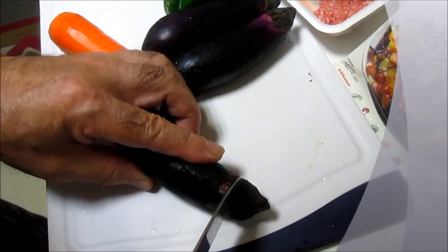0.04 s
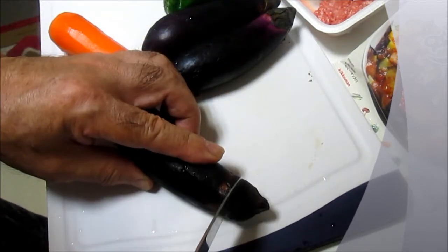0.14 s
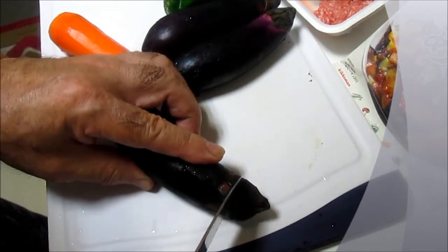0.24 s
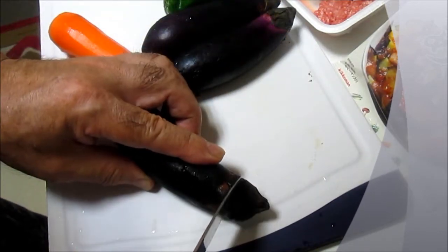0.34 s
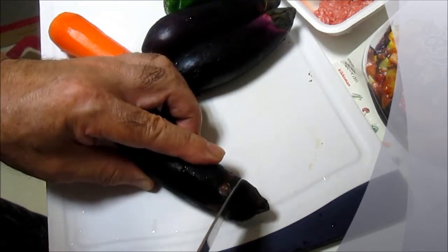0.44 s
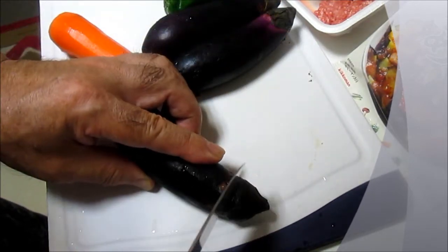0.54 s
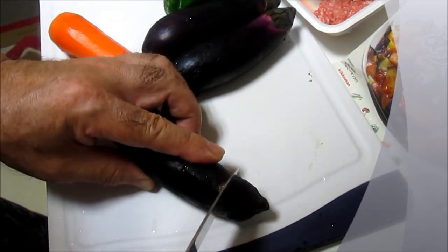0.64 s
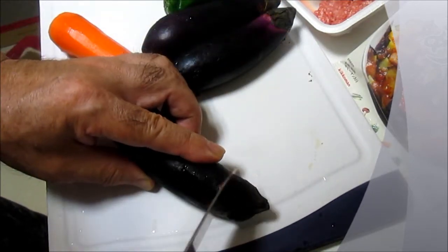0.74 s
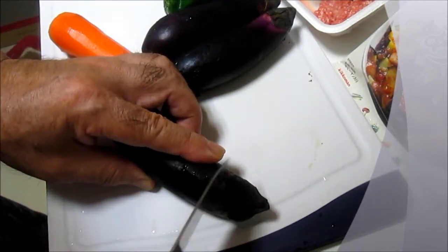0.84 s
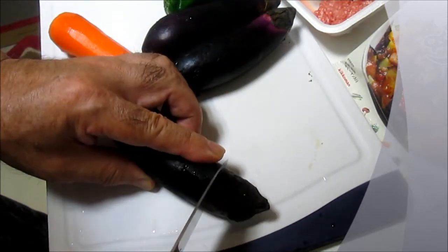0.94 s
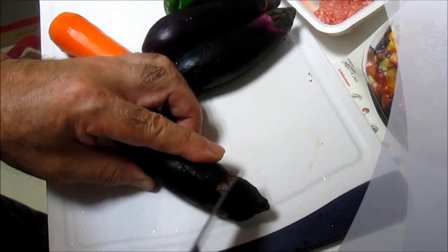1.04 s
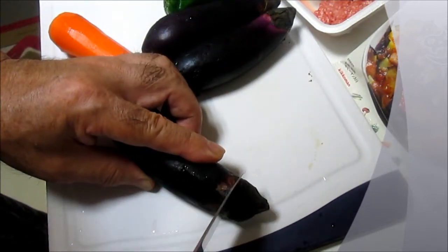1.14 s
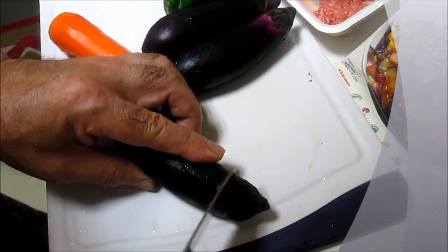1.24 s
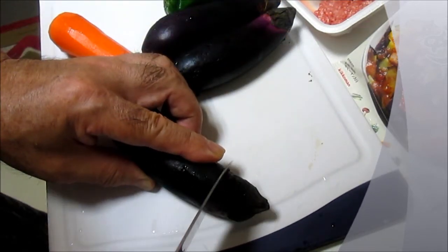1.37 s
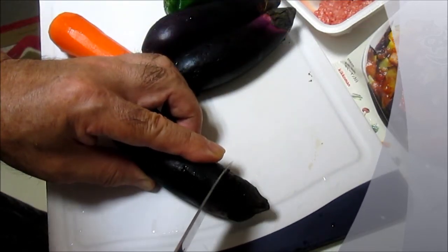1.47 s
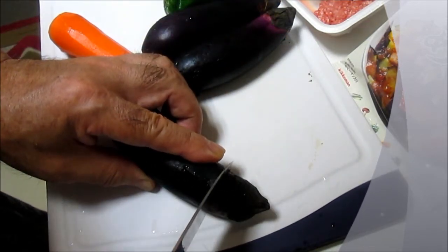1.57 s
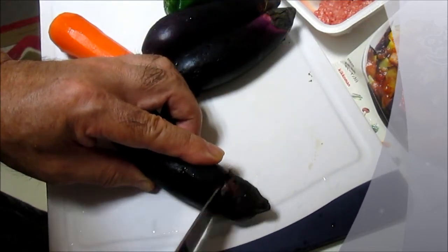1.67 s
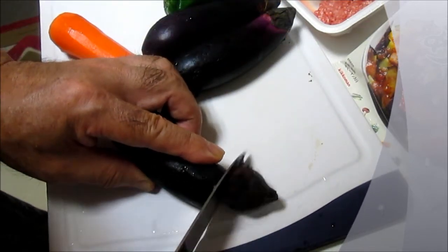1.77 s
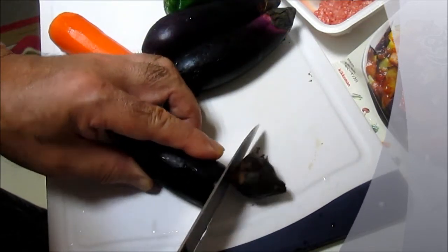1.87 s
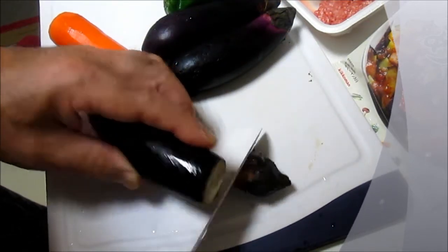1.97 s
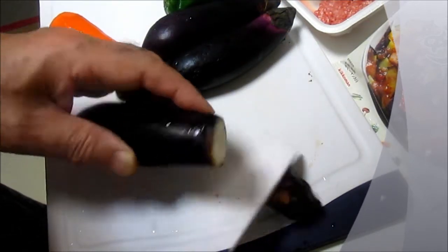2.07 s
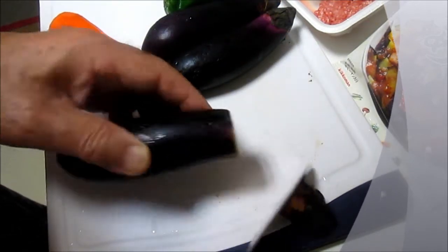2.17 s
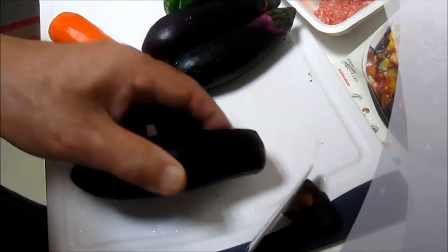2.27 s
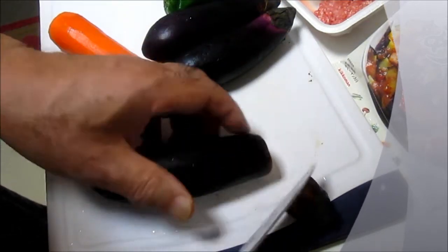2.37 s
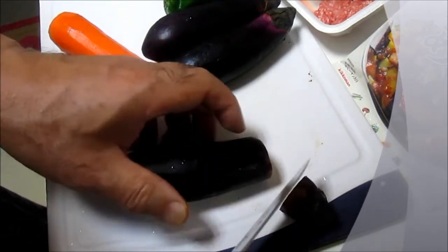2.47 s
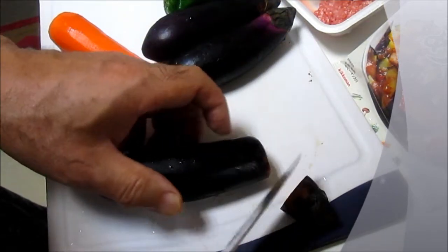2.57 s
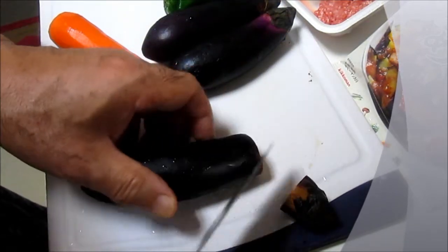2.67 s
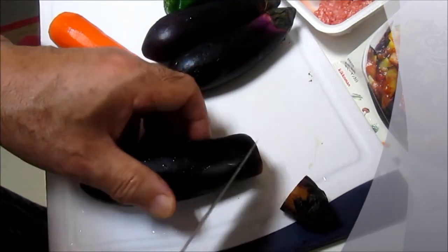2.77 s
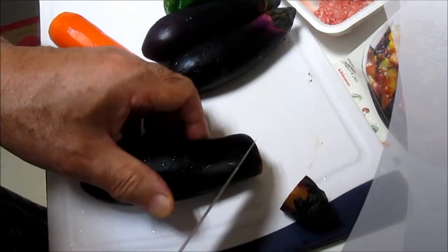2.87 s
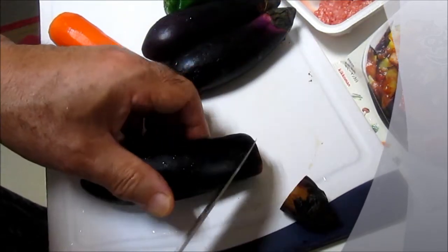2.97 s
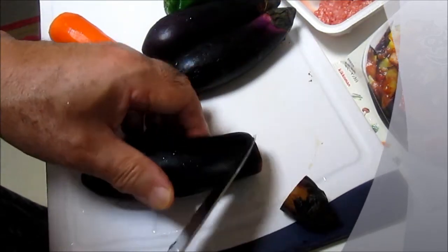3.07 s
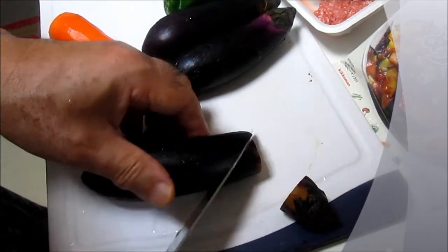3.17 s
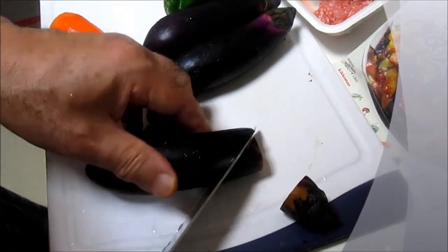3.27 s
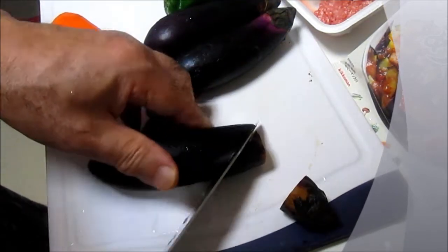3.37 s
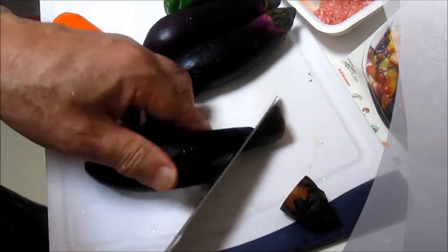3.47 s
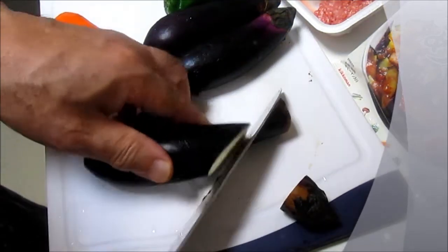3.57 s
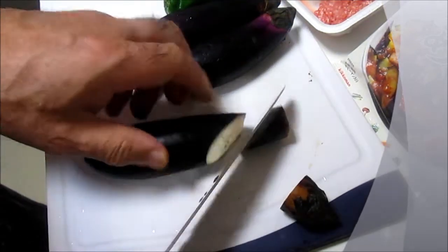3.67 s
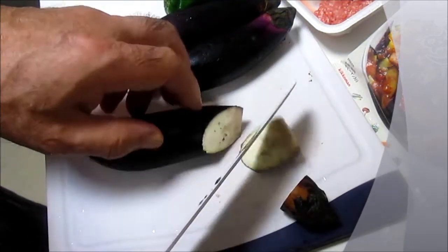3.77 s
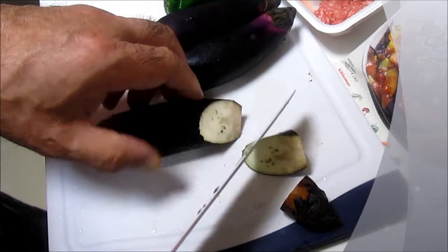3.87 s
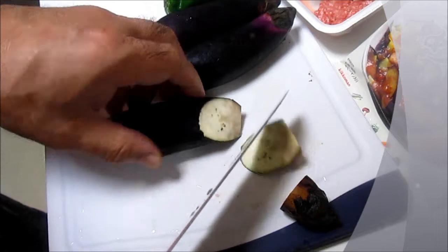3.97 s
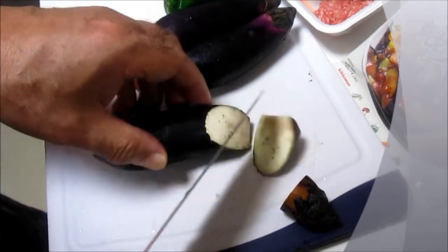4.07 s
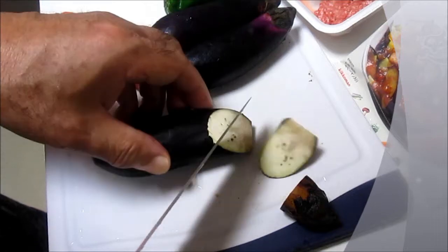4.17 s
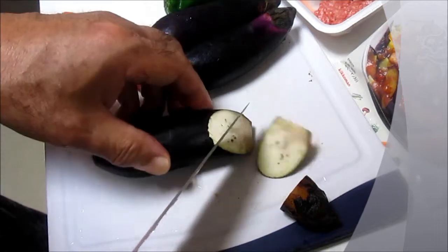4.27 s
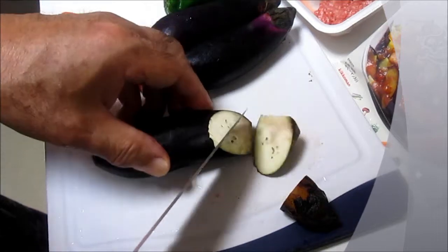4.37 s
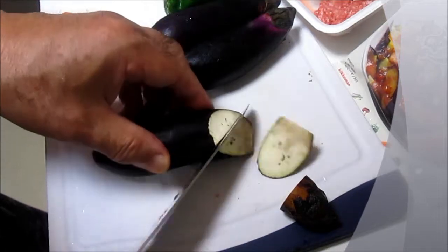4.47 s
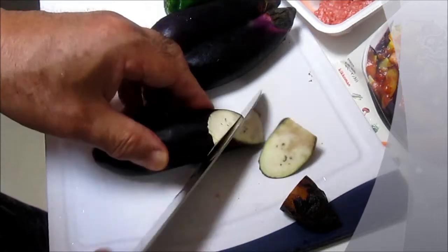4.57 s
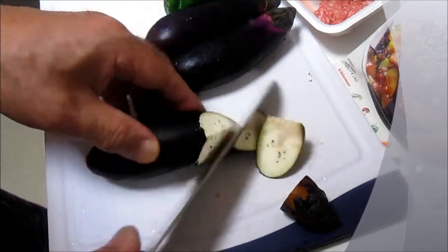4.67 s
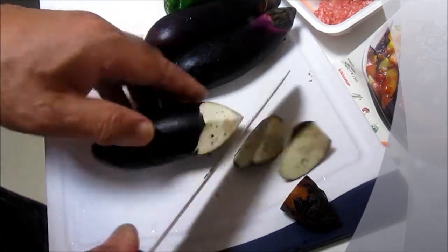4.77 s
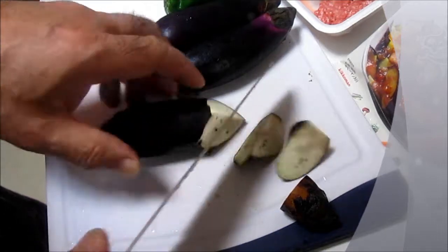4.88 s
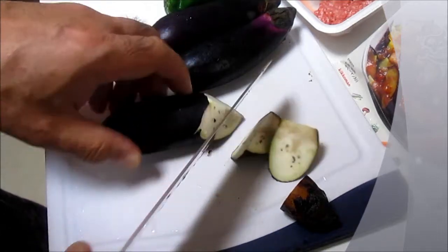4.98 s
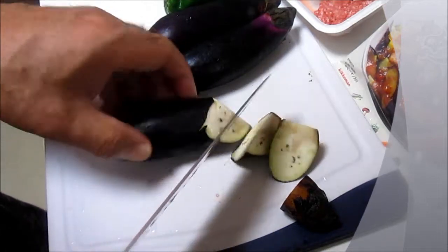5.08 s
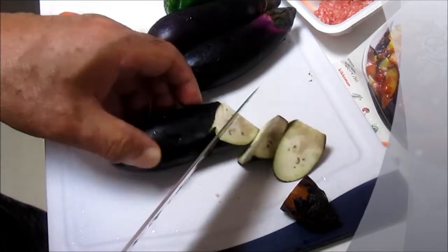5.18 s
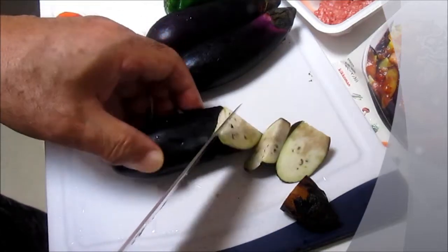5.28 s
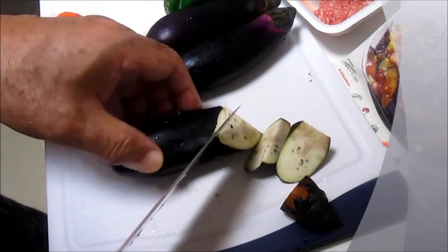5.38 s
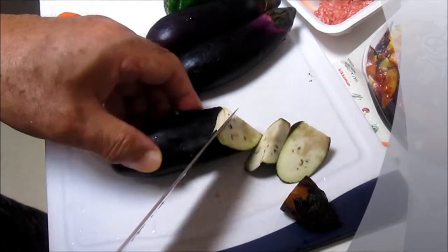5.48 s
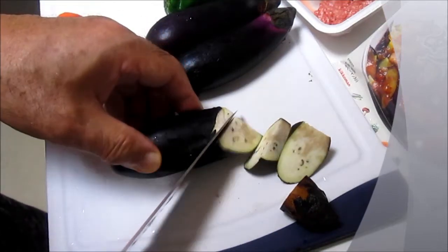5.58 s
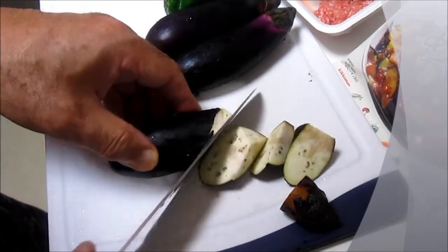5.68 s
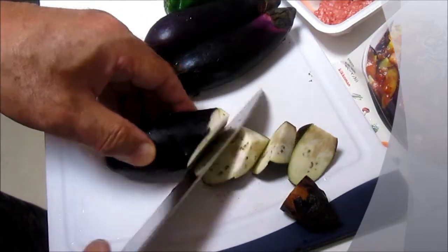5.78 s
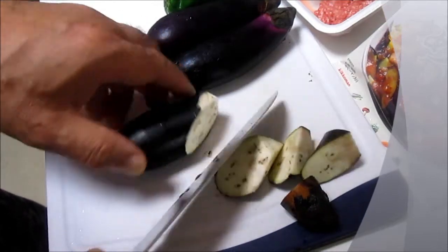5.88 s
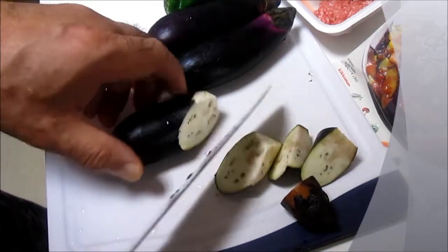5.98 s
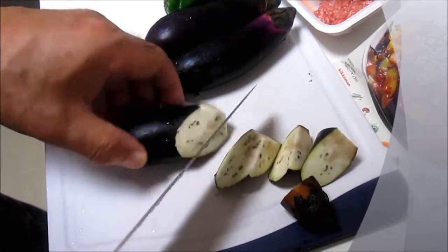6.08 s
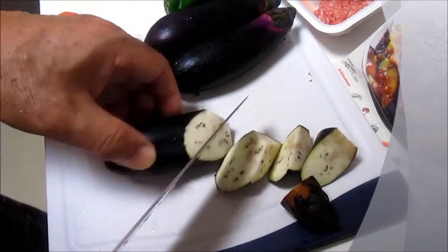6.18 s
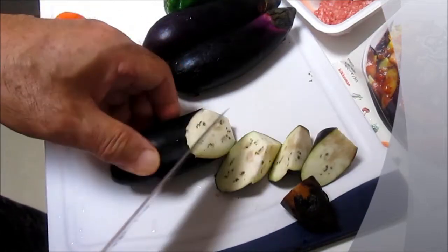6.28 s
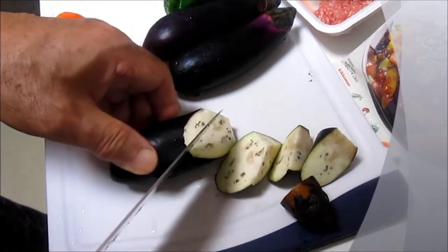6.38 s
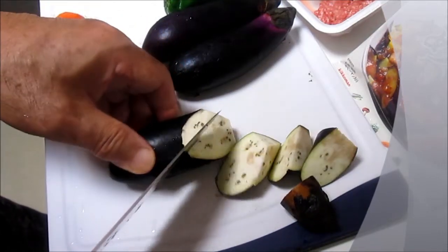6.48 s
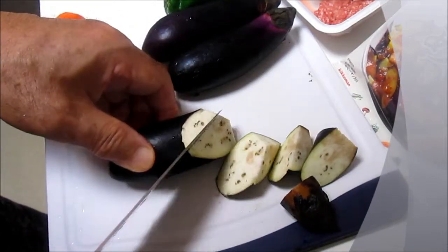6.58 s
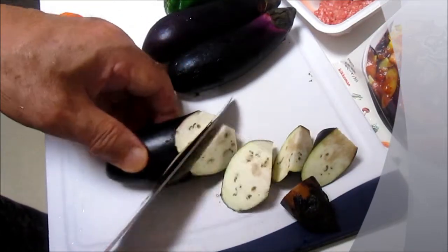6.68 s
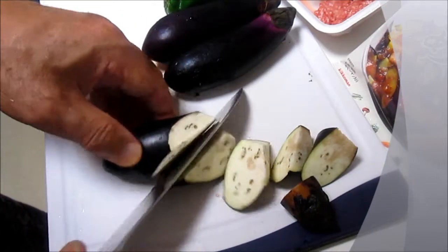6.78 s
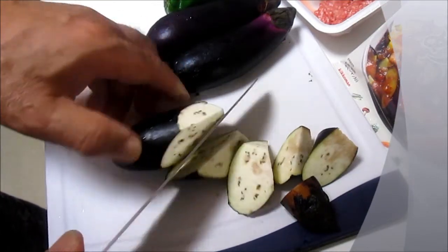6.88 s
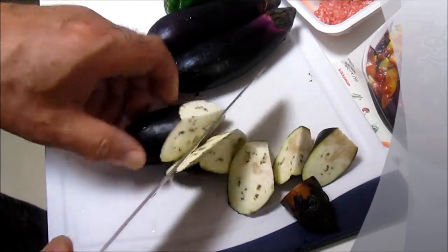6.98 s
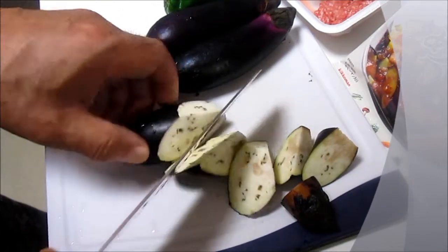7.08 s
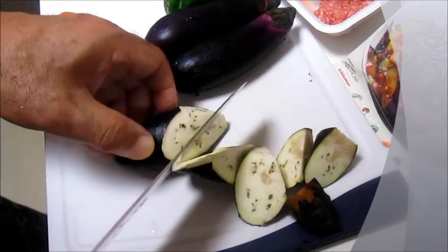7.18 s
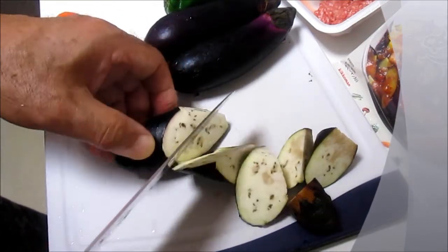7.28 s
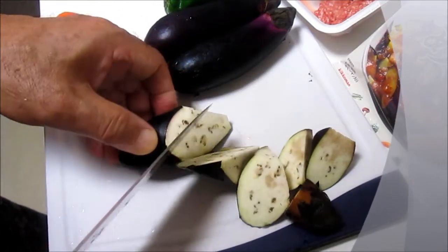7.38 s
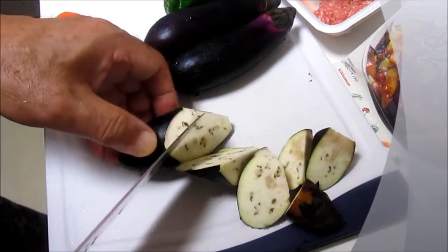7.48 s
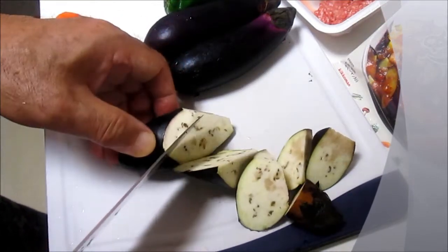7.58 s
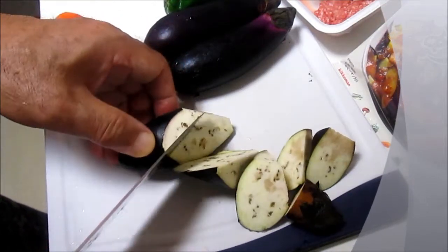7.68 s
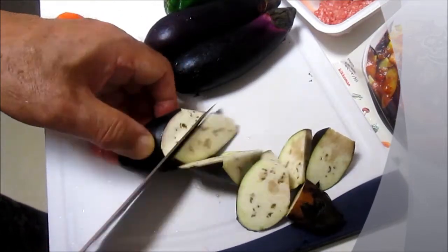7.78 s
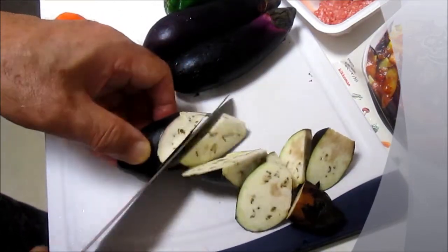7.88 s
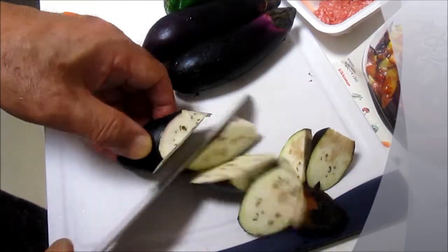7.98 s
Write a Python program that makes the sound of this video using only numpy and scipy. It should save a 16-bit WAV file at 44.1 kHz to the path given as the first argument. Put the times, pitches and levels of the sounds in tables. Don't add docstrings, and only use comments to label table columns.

```python
import sys
import numpy as np
from scipy import signal
from scipy.fft import rfft, irfft, next_fast_len
from scipy.io import wavfile
from scipy.ndimage import map_coordinates

SR = 44100
rng = np.random.default_rng(int(sys.argv[2]) if len(sys.argv) > 2 else 0)


def invert_db(level):
    return 10 ** (np.asarray(level, dtype=float) / 20)


def put_to_file(sound):
    columns = np.atleast_2d(sound).T
    safe = np.clip(columns, -1, 1)
    whole_steps = np.round(safe * 32767)
    wavfile.write(sys.argv[1], SR, whole_steps.astype(np.int16))


N = 354123
T = np.arange(N) / SR


def unit(x):
    return x / np.sqrt(np.mean(x ** 2) + 1e-20)


def along(points, hz):
    f, v = np.transpose(points)
    return np.interp(np.log(hz + 1), np.log(f + 1), v)


def wobble(rate, size=N):
    knots = rng.standard_normal(int(size * rate / SR) + 4)
    return map_coordinates(knots, [T[:size] * rate], order=2)


def coloured(x, spectrum):
    m = next_fast_len(len(x) + 8192)
    response = invert_db(along(spectrum, np.fft.rfftfreq(m, 1 / SR)))
    return unit(irfft(rfft(x, m) * response, m)[:len(x)])


def noise(size, spectrum):
    return coloured(rng.standard_normal(size), spectrum)


def span(s, gain):
    end = s[-1] + 0.005
    at = slice(round(s[0] * SR), round(end * SR))
    edge = np.sqrt(np.clip(np.minimum(T[at] - s[0], end - T[at]) / 0.0031, 0, 1))
    return at, lambda db: invert_db(np.interp(T[at], s, db) - gain[at]) * edge


# f/Hz, level/dB per Hz
PUSH = [(60, -27), (110, -2.5), (250, 0.5), (420, 1.5), (700, -36)]


def strokes(tables, blades, rasp, hiss, gain, grit_db, wet_db, sag=0):
    out = np.zeros(N + SR)
    for rows, blade in zip(tables, blades):
        s, rasp_db, hiss_db, push_db, ring_db = np.transpose(rows)
        at, level = span(s, gain)
        n = len(T[at])
        grit = invert_db(grit_db * (wobble(400, n) + 1.3 * wobble(100, n)))

        def grains(spectrum):
            return coloured(grit * rng.standard_normal(n), spectrum)

        steel = np.zeros(n)
        bent = T[:n] * (1 + sag - sag * T[:n] * SR / n)
        for hz, db, wander in blade:
            fed = invert_db(db + 3.2 * wobble(45, n))
            phase = 2 * np.pi * (hz * bent + rng.uniform()) + 1.5 * wobble(wander, n)
            steel += fed * np.sin(phase)
        sound = level(rasp_db - 0.5) * grains(rasp)
        sound += level(hiss_db) * grains(hiss)
        sound += level(push_db - 3.5) * grains(PUSH)
        sound += level(rasp_db + ring_db) * unit(steel)
        sound = room(invert_db(-1.95) * sound, wet_db)
        out[at.start:][:len(sound)] += sound
    return out[:N]


# hiss, push, ring level/dB under the rasp
STEM = [(-9.5, 5.5, -14.5), (-14.5, 13, -13.5), (-17, 3, -20), (-10, -1, -9), (-6.5, -12, -17.5)]
FLESH = [(-7.5, -6, -4), (-11.5, -7.5, -1), (-5, -2, -9.5), (-8, -4, -1.5), (-15.5, -4.5, -17.5)]


def cut(row, stuff, juice):
    start, end, bite_db, eased_db, deep_db = row
    bite_wet, deep_wet, part_wet, force_db = juice
    s = [start, start + 0.015, start + 0.03, end - 0.01, end, end + 0.022, end + 0.075]
    rasp = [bite_db - 13, bite_db, eased_db, deep_db, -23.5 + force_db, -43, -61]
    wet = [bite_wet, bite_wet, 0, deep_wet, deep_wet, part_wet, part_wet]
    under = stuff[:1] + stuff + stuff[-1:]
    return [(t, db, db + hiss + more, db + push, steel)
            for t, db, more, (hiss, push, steel) in zip(s, rasp, wet, under)]


# edge bites t/s, comes through t/s, bite level/dB as heard, eased level/dB, deep level/dB
STEM_CUTS = [
    (1.595, 1.6565, -25.5, -43.5, -28),
]
SLICES = [
    (4.305, 4.464, -32.5, -44, -32),
    (5.432, 5.554, -32.5, -42, -32),
    (6.441, 6.591, -33.5, -42, -29.5),
    (7.608, 7.762, -51, -43, -33),
]
# hiss at bite level/dB, deep in level/dB, parting level/dB, force coming through level/dB
JUICE = [
    (-4, -2, -2, -1.5),
    (.1, 1.5, 1.5, .1),
    (-5, .1, 7, -2.5),
    (-1.5, -2.5, 2.5, .1),
    (-1.5, -3.5, -1.5, .1),
]
# f/Hz, level/dB per Hz
FLESH_RASP = [(400, -22), (750, -2.5), (1050, 0.5), (1300, 2.5), (1600, -6.5), (2250, -6), (3000, -16),
              (4500, -39.5)]
# f/Hz, level/dB per Hz
WET_HISS = [(1470, -37.5), (2500, -3), (3690, -4.5), (4880, -2.5), (6920, -6), (10000, -5.5), (14700, -17),
            (16000, -31)]
# f/Hz, level/dB, wander rate/s^-1
BLADE_BURIED = [(1240, 5.5, 45), (1388, 1, 41), (1626, -3.5, 39), (1844, -5, 40), (2200, -3, 70),
                (4500, -13, 55), (4904, -12.5, 60)]


def cuts(gain):
    tables = [cut(row, STEM if row in STEM_CUTS else FLESH, juice)
              for row, juice in zip(STEM_CUTS + SLICES, JUICE)]
    return strokes(tables, [BLADE_BURIED] * len(tables), FLESH_RASP, WET_HISS, gain,
                   grit_db=1.5, wet_db=-12.5, sag=0.04)


def ring(modes, t, pitch, scatter_db, attack):
    tones = 0
    for hz, db, t60 in modes:
        decay = invert_db(db + scatter_db * rng.normal() - 60 * t / t60)
        tones = tones + decay * np.sin(2 * np.pi * hz * pitch * t)
    return tones * (1 - np.exp(-t / attack))


# f/Hz, level/dB per Hz
CRACK = [(1500, -33.5), (2800, 2), (4200, -3.5), (5500, 1), (6800, -21), (8000, -34), (9500, -22),
         (14000, -21), (16500, -34)]
# f/Hz, level/dB per Hz
SLAP = [(250, -31), (480, 8.5), (800, 3), (1500, -3.5), (2500, -7), (3500, -20.5), (6000, -41)]
# f/Hz, level/dB per Hz
RATTLE = [(200, -35), (400, -7), (700, -1), (1050, 0), (1500, -10), (2300, -14), (3500, -27), (6500, -60)]
# f/Hz, level/dB per Hz
CHATTER = [(500, -29), (1100, -0.5), (1800, -4.5), (2500, 3), (3300, -7), (4500, -19), (7000, -38.5)]


def strikes(rows, gain, hold, damp_db, wet_db, walls_db, follow, modes):
    out, t = np.zeros(N + SR), T[:SR // 5]
    low, mid, high = modes
    for s, db, low_db, high_db, crack_db, pitch, slap_db, rattle_db, chatter_db in rows:
        bend = 1 + follow * (pitch - 1)
        board = invert_db(-1.0) * ring(mid, t, pitch, 0.69, attack=0.00037)
        board += invert_db(low_db + 6.0) * ring(low, t, bend, 0.92, attack=0.00076)
        board += invert_db(high_db + 3.5) * ring(high, t, bend, 0.84, attack=0.00022)
        board *= invert_db(damp_db * np.clip((t - hold) / 0.0034, 0, 1))
        crack = invert_db(crack_db + 0.5 - 60 * t / 0.011) * noise(len(t), CRACK)
        crack += invert_db(slap_db - 60 * t / 0.015) * noise(len(t), SLAP)
        crack += invert_db(crack_db - 14.5 - 60 * t / 0.093) * noise(len(t), CRACK)
        crack += invert_db(rattle_db - 60 * t / 0.17) * (1 - np.exp(-t / 0.0043)) * noise(len(t), RATTLE)
        crack += invert_db(chatter_db - 60 * t / 0.24) * noise(len(t), CHATTER)
        start = round(s * SR)
        sound = room(invert_db(db - gain[start]) * -(board + crack), wet_db, walls_db)
        out[start:][:len(sound)] += sound
    return out[:N]


# t/s, peak level/dB as heard, low modes level/dB, high modes level/dB, crack level/dB
KNOCKS = [
    (1.6592, -2, -6, -4.5, -3.5),
    (4.4666, 2.5, -11, -17.5, -27),
    (5.559, -7.5, -4.5, -35, -17),
    (6.5983, 2, -11.5, -16.5, -30),
    (7.7645, 0, -11, -13, -39),
]
# board pitch factor, slap level/dB, rattle level/dB, chatter level/dB
KNOCK_BODY = [
    (1.001, -15, -11, -14.5),
    (1.02, -8, -14.5, -35.5),
    (0.996, -12.5, -14, -46),
    (1.01, -11, -16, -33),
    (1.04, -10, -15, -41),
]
# t/s, peak level/dB as heard, low level/dB, high level/dB, board pitch factor
TAPS = [(1.604, -18.5, -20.5, -18.5, 1), (2.303, -43.5, -10, -14.5, 1.16), (2.362, -43, -20, -28.5, 1.12),
        (3.007, -44, -25, -10, 0.89), (3.015, -37.5, -9, -9.5, 1.33), (3.039, -34.5, -5.5, -6, 0.79),
        (3.045, -26, -8.5, -20, 1.14), (3.066, -34, -18, -18, 0.87), (3.089, -34, -16, -8, 0.9),
        (3.134, -35, -18, -21, 0.95), (3.3, -16.5, -4.5, -22, 0.99), (3.336, -47, -20, -1, 1.5),
        (3.363, -26, -15, -15, 1.24), (3.823, -34.5, -15, -23, 0.81), (4.314, -40.5, -14, 4, 0.75),
        (4.443, -38, -19, 5, 1.5), (4.456, -37, -27, 6.5, 1.5), (4.755, -42.5, -12, -24, 1.15),
        (4.847, -50.5, -8, -18, 1.15), (5.431, -21, -19, -22, 1.22), (5.508, -31, -11, -17, 1.1),
        (6.389, -32, -34.5, -18, 1.34), (7.624, -33.5, -15.5, -18, 1.2)]
# f/Hz, level/dB, t60/s
BOARD_LOW = [(400, -4.5, .07), (560, -7, .05), (725, 1, .07)]
BOARD_MID = [(998, 2.5, 0.032), (1095, -2, 0.036), (1180, -16, 0.013)]
BOARD_HIGH = [(1580, 3.5, 0.028), (1810, -9.5, 0.012), (2100, -1, 0.012), (2493, -3.5, 0.014),
              (2750, -2, 0.0072), (2900, -6.5, 0.0076), (4340, -6, .004), (5550, -8, 0.0026)]
# f/Hz, level/dB, t60/s
STEM_BOARD = [
    [(426, -2.5, .045), (570, -1.5, .04), (720, -1.5, .055)],
    [(1010, 1.5, .045), (1130, 0.5, .03), (1280, 1.5, .03)],
    [(1620, -4, .025), (2150, -8, .02), (2366, -5, .009), (2537, -1, .018), (2750, -3, .007),
     (2900, -1.5, .015), (3490, -5, .01), (5700, -8, .003)],
]


def knocks_and_taps(gain):
    hard = [row + body for row, body in zip(KNOCKS, KNOCK_BODY)]
    light = [(s, db, low, high, high - 2, pitch, high + 9, -21, -35) for s, db, low, high, pitch in TAPS]
    board = BOARD_LOW, BOARD_MID, BOARD_HIGH
    out = strikes(hard[:1], gain, hold=0.003, damp_db=-3.5, wet_db=-13.6, walls_db=3.5,
                  follow=0.2, modes=STEM_BOARD)
    out += strikes(hard[1:], gain, hold=0.0045, damp_db=-20.5, wet_db=-13.5, walls_db=9.0,
                   follow=0.2, modes=board)
    out += strikes(light, gain, hold=0.0096, damp_db=-4.5, wet_db=-7.5, walls_db=1.25,
                   follow=1, modes=board)
    return signal.sosfilt(signal.butter(2, 260, "high", fs=SR, output="sos"), out)


def rub(row, rise, rise_db, swell_db, push_db, ring_db):
    start, hold, dying, db, hiss_db = row
    s = start + np.cumsum([0, rise, hold, dying])
    shape = np.array([-rise_db, -swell_db, 0, -27.5])
    steel = ring_db - 8 * (s == s[-1])
    return np.transpose([s, db + shape, db + hiss_db + 0.827 * shape, db + push_db + 0.24 * shape, steel])


# t/s, hold t/s, dying t/s, rasp level/dB as heard, hiss under it level/dB
RUBS = [
    (0.968, 0.012, 0.16, -48, -10.5),
    (2.743, 0.003, 0.032, -53, -26.5),
    (3.037, 0.099, 0.051, -37.5, -8),
    (3.225, 0.18, .015, -57.5, -10),
    (3.296, 0.0021, .045, -26, -21),
    (3.3595, 0.003, 0.059, -34.5, -6.5),
    (6.064, 0.016, 0.032, -50.5, -27),
    (6.433, 0.024, 0.022, -41.5, -16),
    (7.598, 0.024, .02, -53, -22),
]
# f/Hz, level/dB per Hz
RASP = [(400, -16.5), (700, 4.5), (1050, 2.5), (1300, 5.5), (1650, -2.5), (2250, -5.5), (3000, -24.5),
        (4500, -43.5)]
# f/Hz, level/dB per Hz
HISS = [(1470, -37.5), (2500, -0.5), (3690, -3.5), (4880, -2.5), (6920, -7.5), (9360, -7.5), (10400, -10),
        (14700, -19), (16000, -31)]
# f/Hz, level/dB, wander rate/s^-1
BLADE_SAWING = [(389, 8, 24), (844, -6, 52), (1000, 3.5, 120), (1400, -18.5, 30), (2070, 4, 35),
                (3480, -16, 120), (4170, -18.5, 90), (4900, -25.5, 70), (5650, -19, 90)]


def rubs(gain):
    tables = [rub(row, rise=0.0044, rise_db=12.5, swell_db=-4.0, push_db=-2.0, ring_db=-7.5) for row in RUBS]
    return strokes(tables, [BLADE_SAWING] * len(RUBS), RASP, HISS, gain, grit_db=1.44, wet_db=-9)


# t/s, hold t/s, dying t/s, rasp level/dB as heard, hiss under it level/dB
SCRAPES = [
    (1.958, 0.0037, 0.042, -32, -8),
    (1.978, 0.02, 0.11, -38, -3.5),
    (2.05, 0.093, 0.053, -55, -9.5),
    (4.643, 0.011, 0.045, -35.5, -7),
    (5.749, 0.024, 0.045, -29.5, -8),
    (6.748, 0.0041, 0.035, -43.5, -17.5),
    (7.941, 0.035, 0.04, -38, -6.5),
    (8.012, 0.0068, 0.01, -42, -27),
]
# push on the board level/dB, blade ring level/dB over the rasp
SCRAPE_LOAD = [
    (-11.5, -6),
    (-6, -2),
    (7, 0),
    (-5, -1.5),
    (-11, -1),
    (-6, -2.5),
    (-11, -0.5),
    (-4, -4.5),
]
# f/Hz, level/dB per Hz
DRAG = [(1290, -30), (2200, 4), (2870, 0.5), (5300, -1), (7270, -11), (13000, -19), (16000, -39)]
# f/Hz, level/dB, wander rate/s^-1
BLADE = [(538, 1.5, 21), (1250, 9, 24), (1350, -9, 14), (2380, 7, 17), (3117, -12, 34), (3870, -19, 28),
         (4400, -19, 17), (4740, -14, 15), (5220, -4, 23), (6130, -11, 24), (8333, -15.5, 35),
         (9130, -10, 25), (9970, -6, 33), (11960, -18, 30)]
BLADE_LOADED = [(730, -4, 29), (1165, 1.5, 32), (1440, -4, 50), (1750, -6, 29), (2060, -7, 28),
                (2550, -10, 40), (4340, -18, 25), (5100, -17, 23), (6160, -24, 40), (6440, -27, 25),
                (8400, -32, 18)]
BLADE_LIFTING = [(547.4, 7, 9.9), (964, -1, 16), (2530, -11, 17), (3483, -8, 9.6), (4716, -14, 15),
                 (8339, -15, 8), (9200, -7, 6)]
BLADE_TIPPING = [(753, 2, 71), (1370, -2, 50), (2110, -9, 55), (3138, -10, 30), (4118, -15, 30),
                 (4730, -18, 20), (5512, -15, 30), (6200, -21, 30), (8440, -25, 25), (10430, -20, 25)]


def scrapes(gain):
    blades = [BLADE, BLADE, BLADE_LIFTING, BLADE_TIPPING,
              BLADE_LOADED, BLADE_LOADED, BLADE_BURIED, BLADE_TIPPING]
    tables = [rub(row, rise=0.012, rise_db=26.5, swell_db=2.5, push_db=push, ring_db=steel)
              for row, (push, steel) in zip(SCRAPES, SCRAPE_LOAD)]
    return strokes(tables, blades, RASP, DRAG, gain, grit_db=1.05, wet_db=-12)


# t/s,
# f/Hz, peak level/dB as heard, swell t/s, t60/s
SINGING = [(1.72, 231, -47, 0.06, 0.9), (2.01, 237, -40, 0.04, 0.2), (1.962, 549, -42, 0.05, 0.15),
           (1.962, 1192, -34, 0.012, 0.3), (1.975, 2502, -39, 0.03, 0.2), (1.965, 3116, -49, 0.03, 0.2),
           (1.97, 3799, -52, 0.02, 0.2), (1.995, 4714, -51, 0.03, 0.2), (1.978, 5136, -42, 0.022, 0.12),
           (1.97, 8340, -59, 0.025, 0.2), (1.97, 9965, -55, 0.03, 0.1), (2.03, 9119, -69, 0.1, 0.15),
           (2.07, 8349, -67, 0.05, 0.15), (2.03, 3467, -65, 0.04, 0.2), (2.09, 576, -48, 0.06, 0.12),
           (4.65, 739, -37, 0.015, 0.12), (4.655, 2491, -56, 0.02, 0.15), (4.77, 1193, -54, 0.012, 0.07),
           (5.45, 9130, -52, 0.06, 0.2), (5.47, 8337, -62, 0.03, 0.2), (5.755, 1260, -35, 0.012, 0.06),
           (5.757, 1470, -39, 0.015, 0.08), (5.76, 4430, -50, 0.018, 0.08), (5.76, 6200, -55, 0.012, 0.08),
           (1.96, 1670, -42, 0.012, 0.1), (1.97, 1390, -43, 0.02, 0.15), (1.965, 2290, -46, 0.015, 0.12),
           (1.975, 5510, -53, 0.02, 0.25), (1.97, 5870, -54, 0.02, 0.1), (1.99, 4100, -55, 0.03, 0.2),
           (2.095, 2440, -56, 0.015, 0.08), (2.135, 2480, -61, 0.015, 0.08),
           (5.765, 1193, -29.5, 0.018, 0.09), (5.76, 744, -35, 0.015, 0.12),
           (5.748, 2553, -46, 0.012, 0.08), (5.762, 1757, -32, 0.02, 0.07), (5.76, 2058, -34.5, 0.018, 0.1),
           (5.762, 3749, -45, 0.02, 0.13), (5.778, 5460, -46, 0.012, 0.11), (5.79, 8412, -66, 0.015, 0.15),
           (4.648, 1380, -38.5, .012, .08), (4.648, 2060, -46, .012, .09), (4.65, 3140, -49, .012, .09),
          (4.65, 3490, -53, .015, .1), (4.65, 4120, -51, .012, .09), (4.65, 4670, -55, .012, .1),
          (4.65, 5510, -53, .015, .1), (4.65, 6140, -57, .01, .06), (7.95, 743, -43, .025, .1),
          (7.96, 991, -45, .02, .1), (7.952, 1290, -39, .02, .09), (7.95, 1780, -48, .025, .09),
          (7.955, 2050, -51, .025, .1), (7.955, 3530, -57, .02, .1), (7.955, 3860, -55, .02, .1),
          (7.96, 4030, -55, .02, .1), (7.952, 4960, -53, .015, .08), (7.955, 5980, -59, .02, .1),
          (7.955, 7060, -63, .02, .1), (7.95, 8390, -65, .025, .1), (.97, 2260, -62, .02, .2),
          (.97, 4010, -66, .02, .2), (.97, 4700, -70, .02, .15), (.97, 5460, -69, .02, .2)]


def singing(gain):
    out = np.zeros(N)
    for s, hz, db, swell, t60 in SINGING:
        start = round(s * SR)
        t = T[:SR // 3][:N - start]
        at = slice(start, start + len(t))
        rise = np.sin(np.pi / 2 * np.clip(t / swell, 0, 1)) ** 2
        decay = invert_db(-60 * np.maximum(t - swell, 0) / t60)
        note = np.sin(2 * np.pi * hz * t + 0.5 * wobble(30, len(t)))
        note *= np.clip((1 / 3 - t) / 0.05, 0, 1)
        out[at] += invert_db(db + 1 + 2.5 * wobble(60, len(t)) - gain[at]) * rise * decay * note
    return out


# t/s, swell t/s, dying t/s, bump level/dB as heard
ROLLS = [
    (2.351, 0.014, 0.033, -39.5),
    (3.049, 0.024, 0.059, -35),
    (4.755, 0.032, 0.043, -37.5),
    (4.842, 0.026, 0.033, -37),
    (5.8, 0.039, .034, -53),
    (6.54, 0.042, 0.048, -34),
]
# f/Hz, level/dB per Hz
BUMP = [(40, -16.5), (90, 12), (130, 5), (250, 4.5), (400, 1), (600, -34), (1400, -22), (2200, -66.5)]


def rolls(gain):
    out = np.zeros(N)
    for start, swell, dying, db in ROLLS:
        at, level = span(start + np.cumsum([0, swell, dying]), gain)
        n = len(T[at])
        lumps = invert_db(3.5 * wobble(55, n)) * rng.standard_normal(n)
        out[at] += level(db - np.array([6.5, 0, 8.5])) * coloured(lumps, BUMP)
    return out


# delay t/s, level/dB, sign
WALLS = [(0.0105, -7, -1), (0.0168, -16, 1), (.027, -12.5, 1)]
# f/Hz, t60/s
KITCHEN = [(150, 0.61), (700, 0.27), (2500, 0.25), (5000, 0.21),
           (9000, .17), (14000, 0.13)]


def room(x, wet_db, walls_db=0):
    size = SR // 3
    hz, t, z = signal.stft(rng.standard_normal(size), SR, nperseg=256)
    decay = invert_db(-60 * t / along(KITCHEN, hz)[:, None])
    tail = signal.istft(z * decay, SR, nperseg=256)[1][:size]
    tail *= (1 - np.exp(-T[:len(tail)] / 0.015)) / np.linalg.norm(tail)
    soft = np.hanning(17) / 8
    for s, db, sign in WALLS:
        tail[round(s * SR):][:len(soft)] += sign * invert_db(db + walls_db) * soft
    tail *= invert_db(wet_db)
    tail[0] = 1
    return signal.fftconvolve(x, tail)


def camera():
    frame_hz, first_tick = 30 / 1.001, 0.01355
    since = (T - first_tick) % (1 / frame_hz)
    modes = [(8246, 5.5, 0.0069), (7730, -2.0, 0.0064), (6700, -11, 0.0066)]  # f/Hz, level/dB, t60/s
    tick = ring(modes, since, 0.96, 0, attack=0.00071)
    return invert_db(-43.5) * tick + invert_db(-67.5) * np.sin(2 * np.pi * 7882 * T)


# f/Hz, level/dB rms
HUM = [(70.0, -55), (113.0, -54.5), (150.7, -44.5), (226.1, -56.5), (258.4, -57.5), (301.5, -56),
       (339.1, -62.5), (398.4, -74), (489.9, -69), (602.9, -59.3), (629.8, -73), (683.7, -67),
       (839.8, -71.5), (979.8, -67), (1114, -82.5), (1184, -73), (1324, -73)]
# f/Hz, level/dB per Hz
RUMBLE = [(8, -30), (24, 0), (36, -8), (50, -28), (65, -120)]
# f/Hz, level/dB per Hz
AIR = [(18, -21.5), (60, -17.5), (117, -13), (185, -13.5), (300, -16), (400, -21), (610, -24), (1000, -28),
       (1500, -35), (3000, -41.5), (5000, -46.5), (8000, -49.5), (12000, -55.5), (16000, -65.5)]


def fan():
    drift = wobble(3)
    swell = invert_db(5.5 + 1.6 * drift)
    out = np.zeros(N)
    for hz, db in HUM:
        line = np.sin(2 * np.pi * (hz * T + rng.uniform()) + hz / 300 * drift)
        out += invert_db(db) * np.roll(swell, rng.integers(N)) * line
    out += invert_db(-55 + 2.5 * wobble(7.3)) * noise(N, RUMBLE)
    return out + invert_db(-45.5 + 0.6 * wobble(5.9)) * noise(N, AIR)


# t/s, length t/s
CHIRPS = [(0.023, 0.026), (.105, 0.02), (.19, .05), (.305, .022), (0.388, 0.055), (0.504, 0.026),
          (.585, .022), (.66, 0.047), (0.784, 0.024), (.87, 0.056), (0.994, 0.024), (1.066, .055),
          (1.187, 0.025), (1.27, .022), (2.862, 0.026), (2.951, 0.04), (3.2, 0.03), (3.44, 0.043),
          (3.549, 0.023), (3.626, 0.025), (3.707, 0.044), (3.82, 0.022), (3.906, .05), (4.026, 0.049),
          (4.142, 0.02), (4.225, 0.018)]
# t/s, until t/s
TRILLS = [
    (0, 1.45),
    (2.0, 4.3),
    (5.9, 6.1),
]


def crickets():
    on = sum(np.clip(np.minimum(T - s, s + length - T) / 0.0037, 0, 1) for s, length in CHIRPS)
    held = sum(np.clip(np.minimum(T - s, end - T) / 0.03, 0, 1) for s, end in TRILLS)
    chirps = invert_db(-61.5 + 1.7 * wobble(40)) * on * np.sin(2 * np.pi * 3198 * T + 0.6 * wobble(30))
    trill = invert_db(-78 + 3.4 * wobble(10)) * held * np.sin(2 * np.pi * 3490 * T + 0.54 * wobble(16))
    return chirps + trill


OVERLOADS = [
    -1.05,
    1.659,
    4.467,
    5.559,
    6.598,
    7.764,
]
DUCK_DB = [-17, -15.5, -13.5, -5, -14.5, -14]


def gain_db():
    t = T[::64]
    gain = np.zeros(len(t))
    for s, db in zip(OVERLOADS, DUCK_DB):
        since = np.maximum(t - s, 0)
        target = db * (np.exp(-since / 1.09) + 0.26 * np.exp(-since / 0.135))
        gain += (target - gain) * (1 - np.exp(-(since / 0.064) ** 0.65))
    return np.interp(T, t, gain)


def scene():
    gain = gain_db()
    knife = cuts(gain) + knocks_and_taps(gain) + rubs(gain) + scrapes(gain) + singing(gain)
    return (knife + rolls(gain) + camera() + fan() + crickets())[None]


def roll_off(x):
    return signal.sosfilt(signal.butter(12, 16160, fs=SR, output="sos"), x)


def record(dry):
    band = signal.butter(12, 16000, fs=SR, output="sos")
    x = signal.sosfiltfilt(band, dry) * invert_db(gain_db())
    cut_off = x / (1 + np.abs(x) ** 10) ** (1 / 10) - x
    no_thump = signal.butter(2, 120, "high", fs=SR, output="sos")
    mix = x + signal.sosfiltfilt(no_thump, cut_off)
    return roll_off(mix)


dry = scene()
out = record(dry)
put_to_file(out)
```